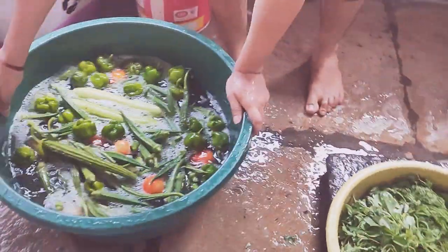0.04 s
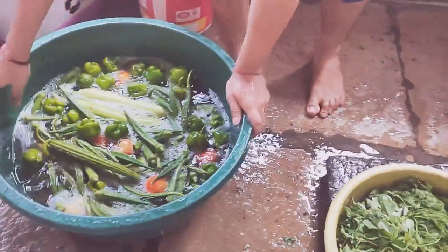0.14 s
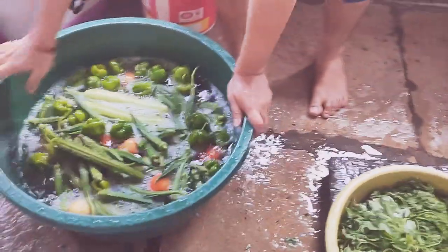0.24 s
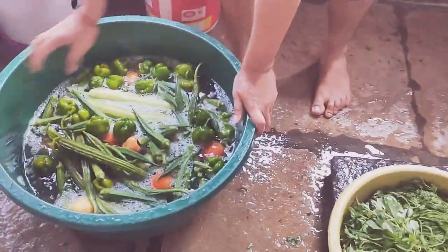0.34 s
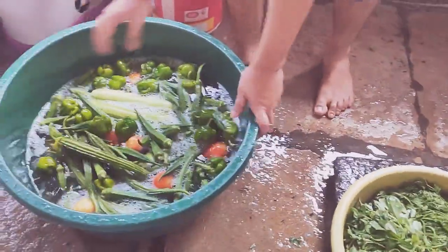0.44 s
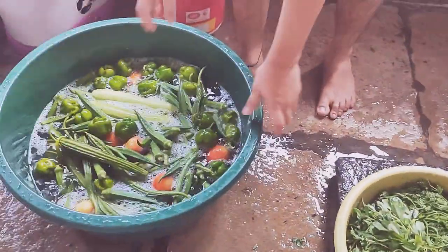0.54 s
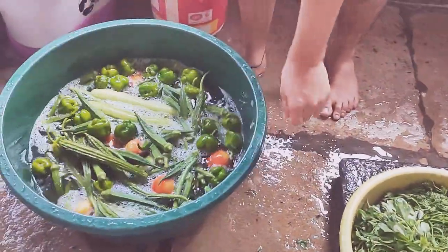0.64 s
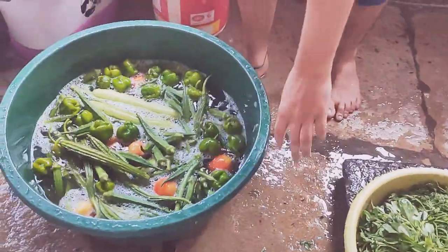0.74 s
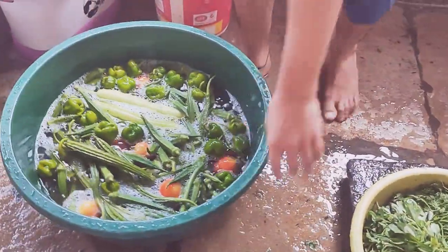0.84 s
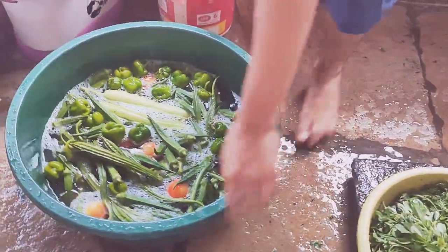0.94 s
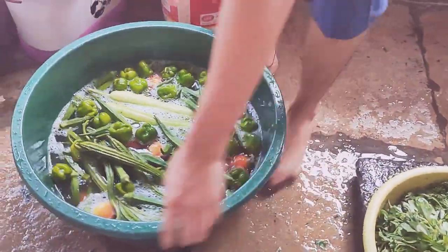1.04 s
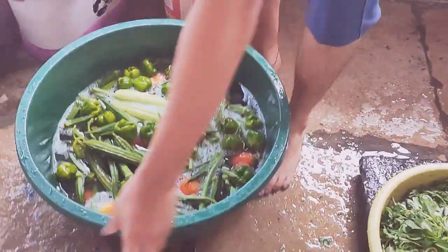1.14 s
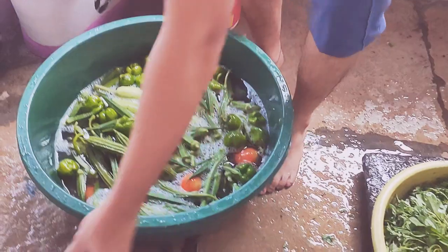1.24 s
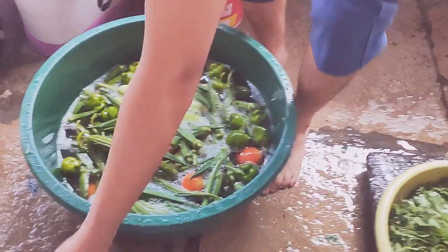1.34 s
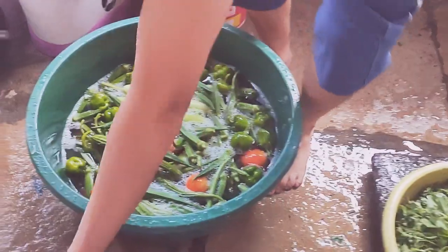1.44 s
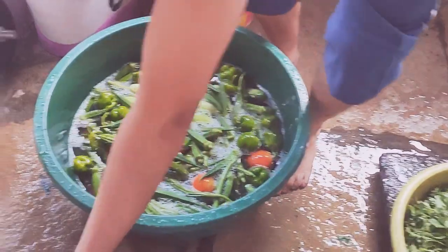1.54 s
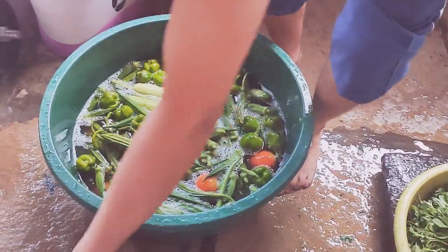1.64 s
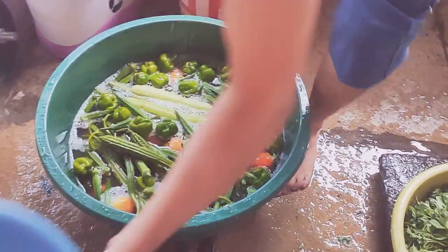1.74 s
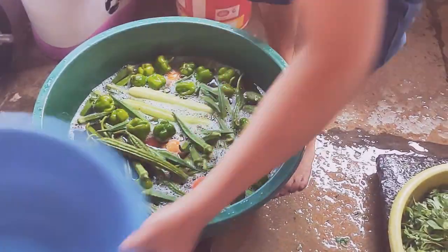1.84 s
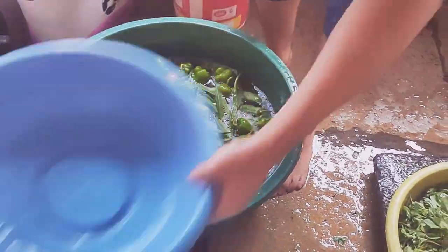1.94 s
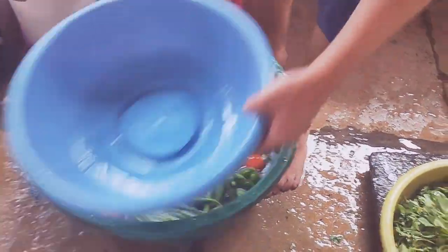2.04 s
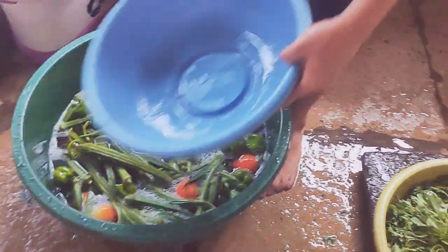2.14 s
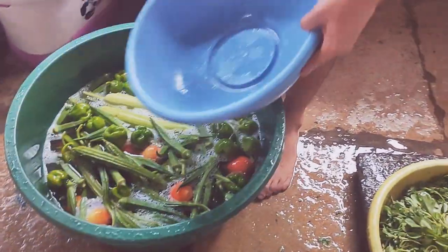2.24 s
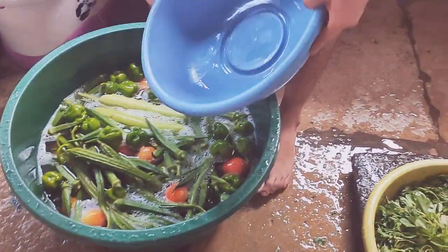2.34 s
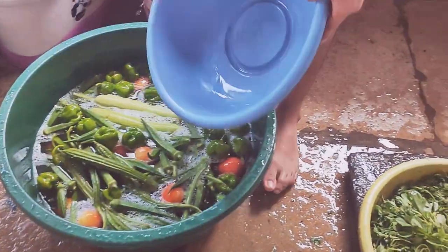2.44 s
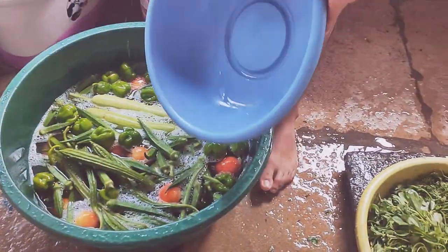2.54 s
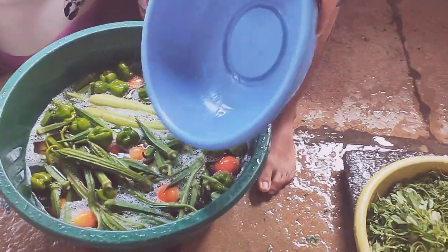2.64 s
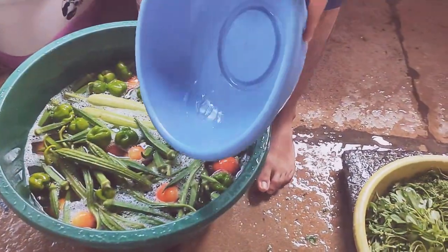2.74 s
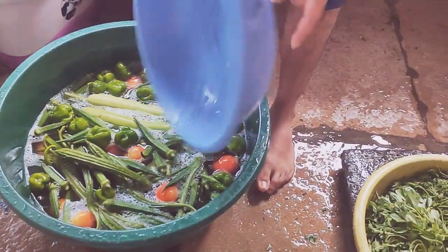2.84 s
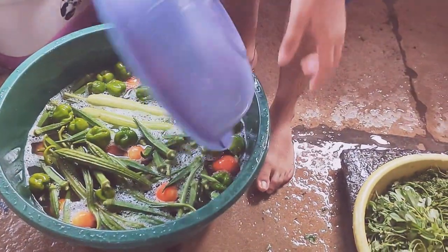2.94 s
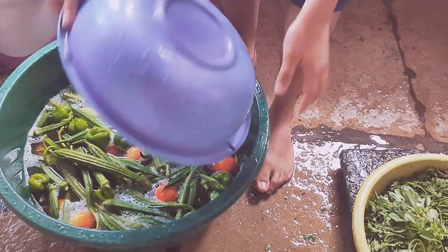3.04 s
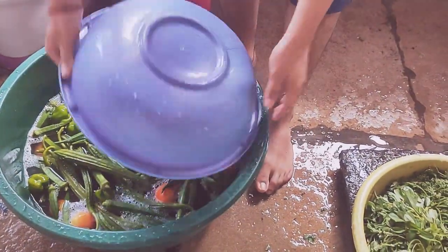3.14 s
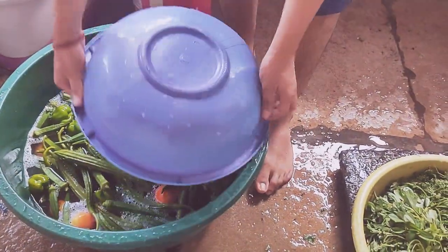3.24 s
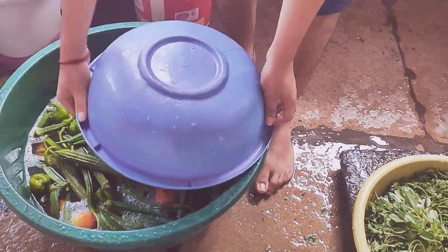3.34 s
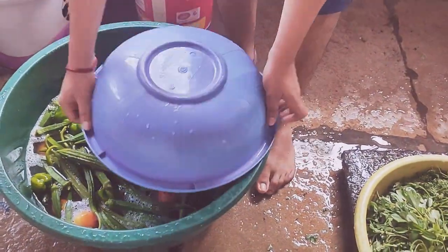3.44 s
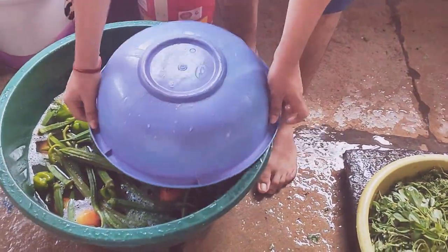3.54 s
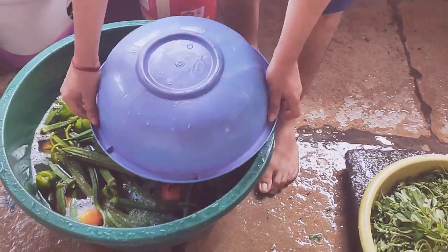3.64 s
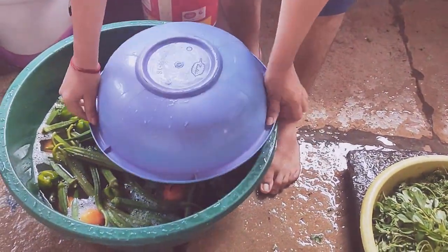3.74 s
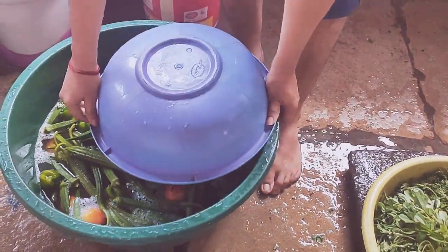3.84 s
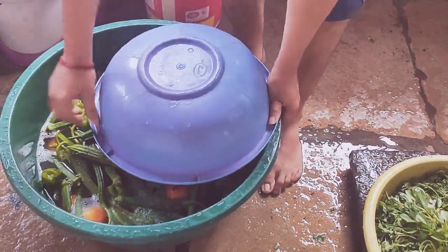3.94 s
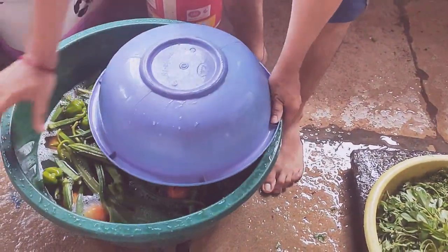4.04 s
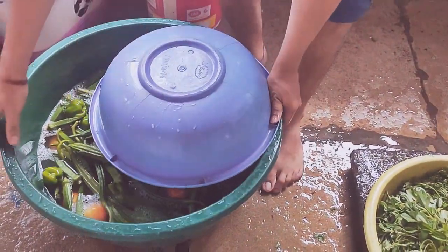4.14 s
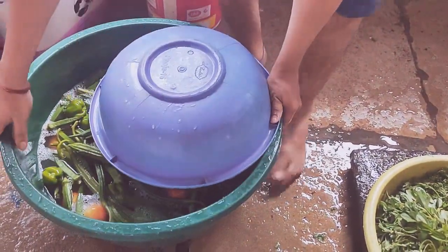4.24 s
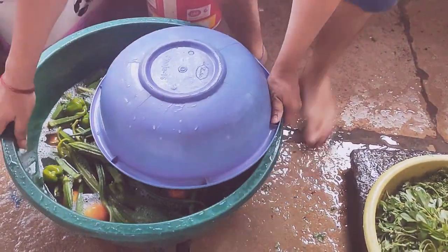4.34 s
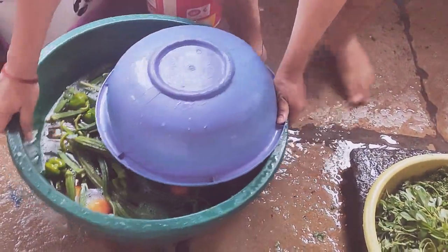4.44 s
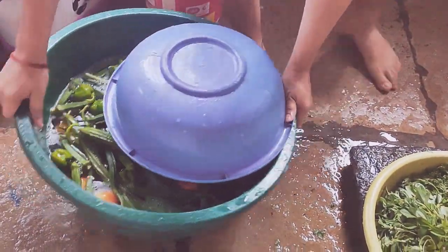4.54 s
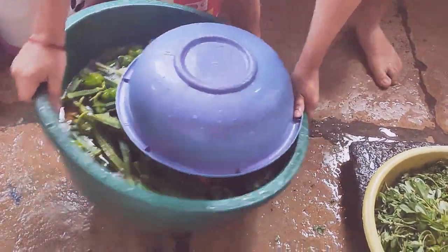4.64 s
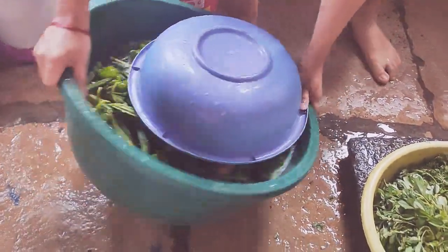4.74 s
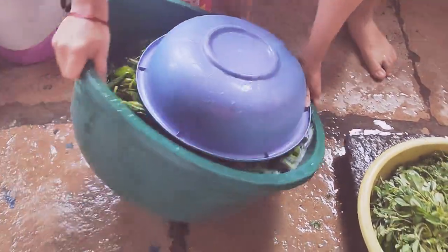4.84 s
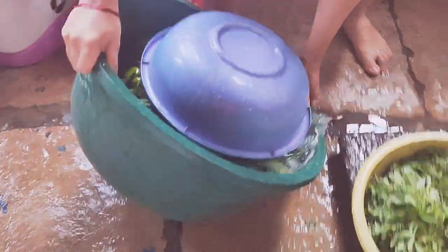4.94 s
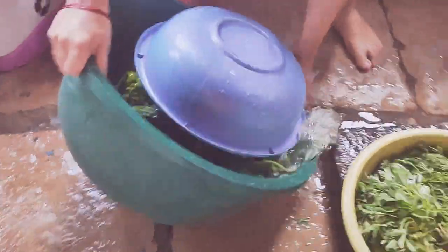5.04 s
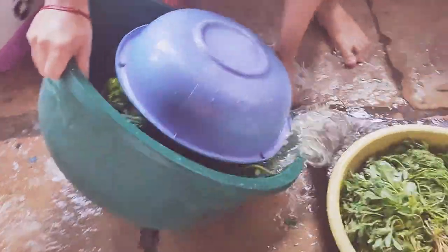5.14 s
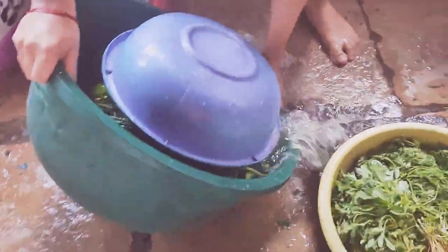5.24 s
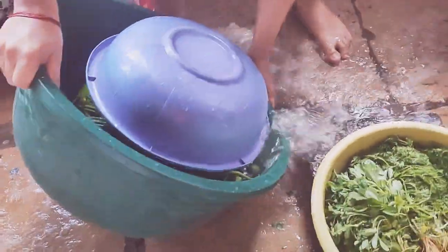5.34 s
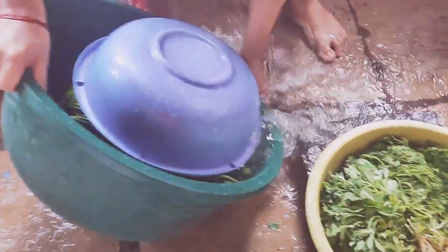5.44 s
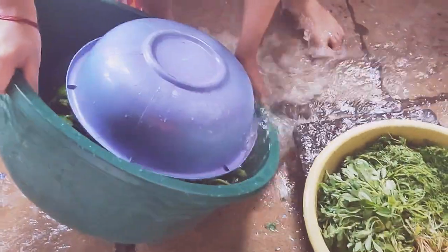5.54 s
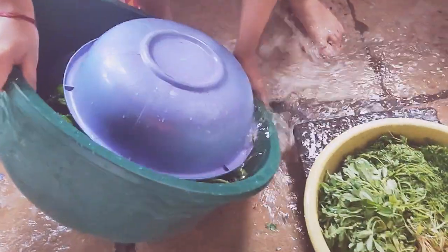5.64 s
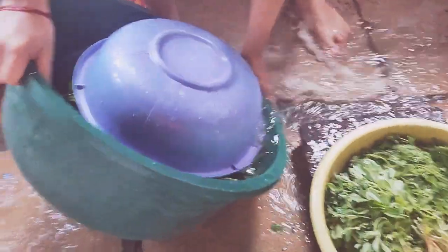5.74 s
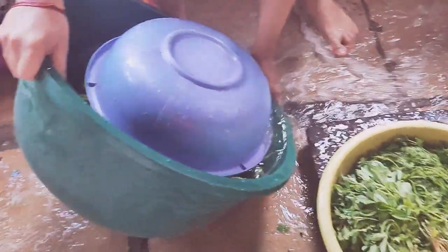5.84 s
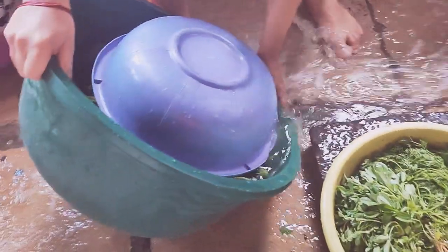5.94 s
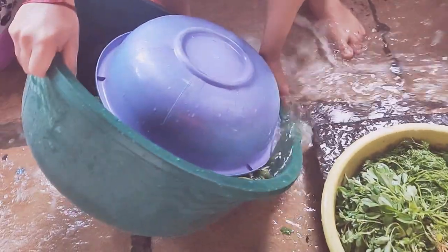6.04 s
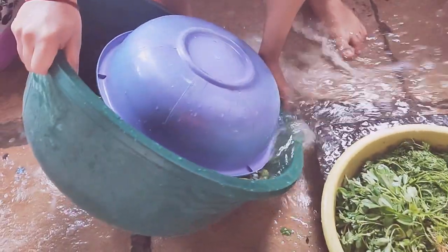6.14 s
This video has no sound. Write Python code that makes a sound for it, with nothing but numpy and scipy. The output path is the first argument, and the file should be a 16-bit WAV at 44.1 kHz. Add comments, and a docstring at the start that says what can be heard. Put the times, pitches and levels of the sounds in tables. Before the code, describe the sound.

Close wet trickle, drips and soft sloshing, a light hollow basin clack, one loud plastic thump, short scraping drags, then water spilling onto stone.

```python
"""In a small washroom, vegetables soak in a plastic tub on a wet stone floor, with water trickling and dripping.
A light basin knocks as it is picked up, and thumps when it is pressed over the vegetables as a lid.
The tub is dragged and tipped, and its water pours out over the stone.
Blows and jerks ring the plastic at its own pitches; water is built from random clicks and ringing bubbles."""
import sys
import numpy as np
from scipy import signal
from scipy.fft import rfft, irfft, next_fast_len
from scipy.io import wavfile

SR = 44100
rng = np.random.default_rng(int(sys.argv[2]) if len(sys.argv) > 2 else 0)


def store_wav(level_fs):
    """Save 16-bit WAV to argv[1]."""
    pcm = np.round(np.clip(np.atleast_2d(level_fs), -1, 1) * 32767)
    wavfile.write(sys.argv[1], SR, pcm.T.astype(np.int16))


N = 272538
TIME = np.arange(N) / SR  # seconds

# Drops smacking the wet stone. Each row: start in seconds, relative level in dB.
DRIPS = [(0.1335, -40.5), (0.187, -30.5), (0.3797, -36.5), (0.4718, -38), (0.788, -27.5), (0.9584, -37.5),
         (1.037, -36.5), (1.1176, -36), (1.2656, -38.5), (1.33, -37), (1.5006, -40.5), (1.5347, -35.5),
         (1.692, -33.5), (1.8587, -39), (2.006, -35), (2.111, -37), (2.198, -35), (2.2572, -36.5),
         (2.5347, -43.5), (2.569, -36), (2.735, -27.5), (2.9324, -37), (3.1075, -44), (3.824, -36),
         (3.914, -32), (3.9908, -33.5), (4.2375, -42), (4.2694, -32), (4.4587, -27), (4.6016, -41),
         (4.925, -36.5), (5.029, -35), (5.1041, -34.5), (5.905, -38.5), (6.0145, -30.5), (6.08, -27.5)]
# Pitches at which the full tub rings. Each row: pitch in Hz, relative level in dB, time to fall 60 dB in seconds.
TUB_MODES = [(107.4, -11.5, 0.15), (158.3, -1.5, 0.15), (193.7, -1.5, .08), (216, -2, 0.18),
             (237.7, -13.5, 0.45), (287.4, -4, 0.2), (333, -17, 0.22), (375.8, -10, 0.2),
             (421, -16.5, 0.28), (543, -19.5, 0.45), (629, -11.5, 0.11), (686, -22, 0.026),
             (706, -22, 0.15), (776, -12.5, 0.17), (970, -12.5, 0.11), (1095, -18, 0.23),
             (1055, -21.5, 0.17), (1310, -29.5, 0.28), (1600, -36, .18)]
# Flow of the stream from the tipped tub. Each row: time in seconds, relative level in dB.
POUR_FLOW = [(5.0, -66), (5.1, -49), (5.22, -45.5), (5.41, -40.5), (5.51, -40), (5.62, -37.5), (5.76, -41),
             (6.1, -44), (6.18, -41)]


def tub_knocks():
    """Blows on the full tub ring its heavy, water-loaded wall."""
    # Each row: start in seconds, relative strength in dB, contact time in milliseconds.
    blows = [(3.274, -38, 0.12), (3.518, -30.5, 0.12), (3.558, -28, 0.11), (3.7585, -5, 0.18),
             (3.7835, -16.5, 0.15), (3.7995, -11, 0.47), (3.8285, -18.5, 0.6), (4.001, -28, 0.13),
             (4.19, -27, 0.47), (4.698, -36, 0.54), (4.875, -27, 0.22)]
    return knocks(blows, TUB_MODES, crack_db=-11.0, crack_s=0.029, tick_db=-14, wet_db=-7.5)


def basin_knocks():
    """Knocks of the light, empty basin ring its thin shell."""
    # Each row: start in seconds, relative strength in dB, contact time in milliseconds.
    blows = [(.187, -37, 0.22), (.419, -36.5, 0.48), (1.6085, -27, 0.15), (1.6257, -44, 0.14),
             (1.6325, -11.5, 0.14), (1.6598, -39, 0.17), (1.6712, -23, 0.15), (1.7222, -34, 0.2),
             (2.35, -35.5, 0.21)]
    # Pitches of the shell. Each row: pitch in Hz, relative level in dB, time to fall 60 dB in seconds.
    basin_modes = [(137, -19, 0.6), (213.6, -3, 0.13), (268, -12.5, 0.09), (354, -14.5, 0.17),
                   (427, 2, 0.16), (460, -14, 0.043), (606, -8, 0.17), (653, -1.5, 0.051), (731, -17, 0.22),
                   (868, -16.5, 0.29), (1020, -31, 0.1), (1320, -19, 0.1), (1630, -35, .12),
                   (1957, -14, 0.053)]
    return knocks(blows, basin_modes, crack_db=-11.0, crack_s=0.022, tick_db=1, wet_db=-6.0)


def knocks(rows, modes, crack_db, crack_s, tick_db, wet_db):
    """Each blow ticks, rings the shell and rattles briefly; a longer contact is duller."""
    # Spectrum of rattling plastic. Each row: frequency in Hz, relative level in dB.
    crack_colour = [(50, -29.5), (120, -15), (300, -8), (600, 0.5), (950, -1.5), (1600, -10), (2700, -25),
                    (4500, -12), (6500, 3), (8000, -12.5)]
    # Spectrum of the first instant of a blow on plastic. Each row: frequency in Hz, relative level in dB.
    tick_colour = [(100, 5.5), (600, -4.5), (1400, 6.5), (2800, -17.5), (4500, -19.5), (6500, -3.5),
                   (8000, -10)]
    force, t = np.zeros(N), TIME[:SR // 8]
    for s, db, contact_ms in rows:
        push = np.exp(-t / (contact_ms / 1000 + 1e-6))
        add(force, s, amp(db) * push / push.sum())
    crack = unit(colour(rng.standard_normal(len(t)), crack_colour)[0]) * np.exp(-t / crack_s)
    tick = colour(1. * (t == 0), tick_colour)[0]
    body = ring(modes)
    add(body, 0, amp(crack_db) * crack + amp(tick_db) * tick / abs(tick).max())
    return room(signal.oaconvolve(force, body)[:N], wet_db)


def ring(modes):
    """What a plastic shell rings with after one sharp blow: fading tones, scaled to peak 1."""
    t = TIME[:SR // 2]
    wave = np.zeros(len(t))
    for k, (hz, db, t60) in enumerate(modes):
        wave += amp(db - 60 * t / t60) * np.sin(2 * np.pi * hz * t + k * k)
    wave = wave * (1 - np.exp(-t / 0.0021))  # the blow takes a moment to spread over the wall
    return wave / abs(wave).max()


def drag(gain_db=0, slips_per_s=320, rub_db=-3):
    """The heavy tub slips over the stone in small jerks that ring its wall, over a dull rubbing."""
    # Shoves of the tub. Each row: hardest push in seconds, relative level in dB,
    # build-up in seconds, run-out in seconds.
    shoves = [(3.57, -36, 0.06, 0.034), (3.88, -37, 0.05, 0.26), (4.18, -36.5, 0.12, 0.14),
              (4.709, -39, 0.032, .07), (4.915, -34.5, 0.044, 0.091)]
    jerk_colour = [(80, -5.5), (200, -0.5), (400, 0.0), (560, 1.0), (900, -14), (2000, -18.0)]  # Hz, dB
    dull = [(70, -32.5), (130, -12.5), (180, 1.0), (300, -5.5), (420, -12.5), (600, -18.5),
            (1200, -36.5), (4000, -50.5)]  # Hz, dB
    jerks = colour(impacts(slips_per_s, spread_db=-0.2), jerk_colour)[0]
    wall = unit(signal.oaconvolve(jerks, ring(TUB_MODES))[:N])
    rub = unit(colour(impacts(per_s=900, spread_db=-1.0), dull))
    push = together(swell(*row) for row in shoves)
    return amp(gain_db) * push * unit(room(wall + amp(rub_db) * rub, wet_db=-1))


def rubs(gain_db=0, slips_per_s=700, cycles=3.5, count=4):
    """Wet skin sticks and slips on the plastic wall; each slip rings a well-damped patch of it."""
    # Slides of wet hands. Each row: start in seconds, length in seconds, relative level in dB, middle pitch in Hz.
    slides = [(0.816, 0.079, -57.5, 1460), (1.262, 0.083, -59.5, 2010), (1.464, 0.086, -56, 1630),
              (3.272, 0.056, -51.5, 1320), (3.335, .12, -52.5, 1784), (3.469, .12, -53, 1325),
              (4.498, 0.1, -61.5, 920)]
    out = np.zeros(N)
    for s, length, db, hz in slides:
        size = int(length * SR)
        slips = rng.standard_normal((count, size)) * (rng.random((count, size)) < slips_per_s / SR)
        patches = hz * np.geomspace(.86, 1.14, count)
        squeak = np.zeros(size)
        for row, patch_hz in zip(slips, patches):
            squeak += signal.fftconvolve(row, bubble(patch_hz, cycles, glide=0))[:size]
        add(out, s, amp(db) * unit(squeak) * signal.windows.tukey(size, .6))
    return amp(gain_db) * room(out, wet_db=-4.5)


def pour(spray_db=1, gurgle_db=-6.5, hollow_db=-51):
    """The stream breaks into spray on the stone, churns bubbles and drums softly in the tub."""
    # Spectrum of the spray. Each row: frequency in Hz, relative level in dB.
    spray_colour = [(1180, -48.5), (2000, -11), (2870, -14), (4910, -9), (6250, 3.5), (6670, 6.5),
                    (7590, -2.5), (7960, -18.5), (8200, -32), (10700, -56.5), (18000, -120)]
    gurgle_colour = [(500, -4.0), (720, -6), (1100, 2.5), (1700, 0), (3000, -1)]  # Hz, dB
    lag_s = 0.036  # bubbles surface a little after the water lands
    churn_power = 1.08  # bubbling grows faster than the flow, by this power
    spurts = surge(rate=12, depth_db=-0.4)
    spray = unit(room(colour(impacts(per_s=2500, spread_db=3.0) * spurts, spray_colour), wet_db=1.0))
    froth = bubbles(494.5, 3560, per_s=1000, cycles=4.5, spread_db=3.0, count=28) * spurts
    gurgle = unit(room(colour(froth, gurgle_colour), wet_db=3.0))
    hollow = unit(room(bubbles(163.9, 203, per_s=160, cycles=13.0, spread_db=5.0, count=4), wet_db=5.0))
    flow = level(POUR_FLOW)
    share = flow / flow.max()
    churn = np.interp(TIME - lag_s, TIME, flow.max() * share ** churn_power)
    drumming = np.sqrt(share)  # the tub answers even a thin stream
    return amp(spray_db) * flow * spray + amp(gurgle_db) * churn * gurgle + amp(hollow_db) * drumming * hollow


def trickle(spatter_db=-1, bubbling_db=-2):
    """Running water spatters on the floor in spurts, more after each drop, with small bubbles in the puddle."""
    # Spectrum of the spatter. Each row: frequency in Hz, relative level in dB.
    spatter_colour = [(530, -28), (900, -2), (969, -16), (1430, -10.5), (1580, -34), (1720, -6),
                      (1920, -19.5), (2420, -13), (2810, -15), (3950, -14), (4750, -14.5), (6630, 0),
                      (7550, -7.5), (8200, -35), (10700, -72.5), (18000, -120)]
    # Spectrum of small bubbles in the puddle. Each row: frequency in Hz, relative level in dB.
    fizz_colour = [(1000, -3.5), (1750, -9), (2000, -3.5), (2400, 1.5), (3000, -1), (3900, 5.5),
                   (4800, -10), (6000, -14.5)]
    # Water running over the stone. Each row: time in seconds, relative spatter level in dB,
    # relative bubbling level in dB.
    runoff = [(0, -47.5, -56), (.3, -48.5, -55), (.46, -53, -64), (.65, -51.5, -61), (.9, -46.5, -61.5),
              (1.42, -49.5, -59.5), (1.85, -48, -58), (2.4, -47.5, -59), (3.2, -48.5, -59.5),
              (3.4, -49, -59), (3.7, -48.5, -58), (4.2, -48.5, -57), (4.56, -50.5, -63), (4.8, -47, -60),
              (5.2, -48.5, -53.5)]
    # Bursts of fine bubbles. Each row: crest in seconds, relative level in dB.
    froth_bursts = [(.04, -53), (0.322, -49), (0.714, -54), (.975, -69), (1.12, -50.5), (1.7, -48),
                    (1.82, -52), (2.2, -53), (2.561, -53), (4.02, -49.5), (4.612, -50)]
    scatter_db, rise_s, fall_s = -16, .006, 0.026  # droplets thrown by each drop, relative to its smack
    spatter = colour(impacts(per_s=600, spread_db=4.0) * surge(rate=23, depth_db=2.5), spatter_colour)
    swarm = bubbles(1017.5, 5130, per_s=700, cycles=8.1, spread_db=1)
    froth = colour(swarm * surge(rate=11, depth_db=2.5), fizz_colour)
    scatter = together(swell(s + 2 * rise_s, db + scatter_db, rise_s, fall_s) for s, db in DRIPS)
    bursts = together(swell(s, db, rise_s=0.01, fall_s=0.022) for s, db in froth_bursts)
    spatter_gain = together([amp(spatter_db) * level(runoff), scatter])
    froth_gain = together([amp(bubbling_db) * level(runoff, column=2), bursts])
    return spatter_gain * unit(room(spatter, wet_db=5.5)) + froth_gain * unit(room(froth, wet_db=7.0))


def drips(gain_db=4.5, splash_s=0.0039, splash_db=-13, small_db=-56):
    """A drop smacks the stone and throws brief droplets; small drops fall at random throughout."""
    # Spectrum of a drop's smack. Each row: frequency in Hz, relative level in dB.
    smack_colour = [(1000, -34), (3000, -33.5), (4800, -26), (5700, 0), (6550, 7), (7400, -1), (8200, -17)]
    hits, t = np.zeros(N), TIME[:SR // 20]
    for s, db in DRIPS:
        splash = amp(splash_db) * rng.standard_normal(len(t)) * np.exp(-t / splash_s) + (t == 0)
        smack = colour(splash, smack_colour)[0]
        add(hits, s, amp(db) * smack / abs(smack).max())
    small = unit(colour(impacts(per_s=61, spread_db=3.5), smack_colour))
    return amp(gain_db) * room(hits, wet_db=2.5) + amp(small_db) * unit(room(small, wet_db=2.5))


def plops(gain_db=-2, cycles=6, scatter=0.093, gap_s=0.0055, count=5):
    """Each splash traps one large bubble and then a few weaker ones near it in pitch."""
    # Small splashes. Each row: start in seconds, relative level in dB, first bubble's starting pitch in Hz.
    splashes = [(.15, -42.5, 926), (.187, -43, 820), (.32, -52, 2530), (.675, -42, 870),
                (1.424, -33.5, 1584), (1.704, -36.5, 1585), (2.172, -42, 2290), (2.256, -36, 2310),
                (2.676, -42.5, 1400), (2.952, -40.5, 2440), (3.646, -36.5, 1020), (3.66, -34, 538),
                (3.885, -33.5, 533), (4.343, -38.5, 1090), (5.321, -36, 1300), (5.396, -30.5, 1954),
                (5.645, -36, 1043)]
    out, order = np.zeros(N), np.arange(count)
    for s, db, hz in splashes:
        delays = gap_s * (order + rng.uniform(-0.35, 0.484, count) * (order > 0))
        pitches = hz * np.exp(scatter * rng.standard_normal(count) * (order > 0))
        for k in order:
            add(out, s + delays[k], amp(db - 3.0 * k) * bubble(pitches[k], cycles, glide=0.035))
    return amp(gain_db) * room(out, wet_db=0.5)


def slosh(gain_db=-1):
    """Water laps between the vegetables and the tub wall, trapping small pockets of air."""
    # Spectrum of lapping. Each row: frequency in Hz, relative level in dB.
    lap_colour = [(70, -30.5), (150, 3.5), (300, 1), (450, 0.5), (700, -6.5), (950, -17.5), (1400, -11.5),
                  (2500, -39.5)]
    # Waves slapping the tub wall, now and then. Each row: crest in seconds, relative level in dB.
    wave_crests = [(.25, -45.5), (.44, -52), (.7, -50), (.87, -51), (1.04, -49.5), (1.179, -52),
                   (1.52, -44), (1.74, -44), (2.21, -49), (2.359, -45.5), (2.681, -60), (3.05, -50),
                   (3.3, -48.5), (3.66, -39.5), (3.89, -40), (4.35, -46), (4.559, -47), (4.688, -41.5),
                   (5.04, -48)]
    steady_db = -53.5  # the lapping that goes on between waves, before gain_db
    lip_db = -7.5  # lapping at the lip, relative to the flow curve, before gain_db
    laps = unit(colour(impacts(per_s=450, spread_db=4.0), lap_colour))
    pockets = unit(bubbles(262.3, 950, per_s=160, cycles=4, spread_db=2.0))
    waves = together(swell(s, db, rise_s=0.038, fall_s=0.089) for s, db in wave_crests)
    motion = together([amp(steady_db), waves, amp(lip_db) * level(POUR_FLOW)])
    return amp(gain_db) * motion * unit(room(laps + amp(-5.5) * pockets, wet_db=-3.0))


def thuds(gain_db=0, ring_s=0.032):
    """Weight shifting on the floor: a soft load gives a few slow cycles and no click."""
    # Each row: start in seconds, relative level in dB, pitch in Hz.
    shifts = [(0.031, -42.5, 31.8), (2.851, -42.5, 65.4), (3.11, -42, 52.5), (3.237, -40, 54.4),
              (3.275, -38.5, 75), (3.515, -39.5, 92), (3.85, -34, 62), (4.871, -33.5, 101)]
    out, t = np.zeros(N), TIME[:SR // 5]
    for s, db, hz in shifts:
        envelope = np.exp(-t / ring_s) * (1 - np.exp(-t / .004))
        add(out, s, amp(db) * np.sin(2 * np.pi * hz * t) * envelope)
    return amp(gain_db) * room(out, wet_db=-20.0)


def background(rumble_db=-52.5):
    """Steady low rumble of the surroundings, made from filtered noise."""
    # Spectrum of the rumble. Each row: frequency in Hz, relative level in dB.
    rumble_colour = [(10, -15), (28, 1.5), (44, -1), (80, -4), (150, -7), (400, -28.5), (1500, -26),
                     (8000, -46.5)]
    return amp(rumble_db) * unit(diffuse(colour(rng.standard_normal((2, N)), rumble_colour)))


def impacts(per_s, spread_db):
    """Random clicks of either sign; a wider spread makes their sizes more unequal."""
    size = amp(spread_db * np.minimum(rng.exponential(1, N), 4)) * rng.choice([-1, 1], N)
    return size * (rng.random(N) < per_s / SR)


def bubble(hz, cycles, glide):
    """A trapped air pocket rings and, with a glide, rises in pitch as it nears the surface."""
    age = TIME[:SR // 8] * hz / cycles  # 1 when the ringing has faded to about a third
    phase = 2 * np.pi * cycles * (age + glide * np.minimum(age, 5) * age / 2)
    return np.sin(phase) * np.exp(-age) * (1 - np.exp(-age * cycles))


def bubbles(low_hz, high_hz, per_s, cycles, spread_db, count=20):
    """A swarm of bubbles of many sizes, each size with its own pitch."""
    births, kind = impacts(per_s, spread_db), rng.integers(0, count, N)
    pitches = np.geomspace(low_hz, high_hz, count) * rng.uniform(.97, 1.03, count)
    out = np.zeros(N)
    for k, hz in enumerate(pitches):
        out += signal.oaconvolve(births * (kind == k), bubble(hz, cycles, 0.055))[:N]
    return out


def surge(rate, depth_db, count=24):
    """Water arrives in uneven spurts: a random gain that wanders up to rate times a second."""
    t, speeds = np.arange(0, N / SR + .01, .002), np.geomspace(rate / 5, rate, count)
    wander = unit(np.sin(2 * np.pi * (speeds * t[:, None] + rng.random(count))).sum(1))
    return unit(amp(depth_db * np.interp(TIME, t, wander)))


def swell(s, db, rise_s, fall_s):
    """A gain that builds smoothly to its crest at time s and then dies away."""
    age = TIME - s
    drop = np.where(age < 0, (age / rise_s) ** 2, age / fall_s)
    return amp(db) * np.exp(-np.minimum(drop, 20))


def together(gains):
    """Unrelated sounds add in power."""
    return np.sqrt(sum(gain ** 2 for gain in gains))


def level(rows, column=1, fade=0.13):
    """A dB curve as a gain over time, fading out beyond its ends."""
    s, db = np.transpose(rows)[[0, column]]
    outside = np.maximum(np.maximum(s[0] - TIME, TIME - s[-1]), 0)
    return amp(np.interp(TIME, s, db)) * np.exp(-outside / fade)


def amp(db):
    """Decibels to gain."""
    return 10 ** (np.asarray(db) / 20)


def unit(x):
    """Scales to an average (rms) level of 1."""
    return x / np.sqrt(np.mean(x ** 2) + 1e-20)


def read(points, hz):
    """Reads a table between its points on a log-frequency axis."""
    f, value = np.transpose(points)
    return np.interp(np.log(hz + 1), np.log(f + 1), value)


def add(mix, s, sound):
    """Mixes a sound in at time s."""
    part = mix[..., max(round(s * SR), 0):][..., :sound.shape[-1]]
    part += sound[..., :part.shape[-1]]


def colour(x, points):
    """Filters with the given spectrum, never sounding ahead of its input (minimum phase)."""
    log_gain = np.log(amp(read(points, abs(np.fft.fftfreq(4096, 1 / SR)))))
    taps = np.fft.ifft(np.exp(np.conj(signal.hilbert(log_gain)))).real[:2048]
    taps = taps / np.linalg.norm(taps)
    return signal.oaconvolve(np.atleast_2d(x), taps[None], axes=1)[:, :x.shape[-1]]


def diffuse(pair):
    """Makes two unrelated signals as alike at each frequency as two ports hear a diffuse sound."""
    # Each row: frequency in Hz, likeness from -1 (opposite) to 1 (the same).
    likeness = [(30, 1), (130, 0.9), (280, 0.6), (500, .5), (1000, -0.23), (1500, -0.54), (3000, 0),
                (8000, -0.52)]
    size = next_fast_len(pair.shape[1])
    a, b = rfft(pair, size)
    angle = np.arccos(np.clip(read(likeness, np.fft.rfftfreq(size, 1 / SR)), -1, 1)) / 2
    shared, opposed = a * np.cos(angle), b * np.sin(angle)
    return irfft([shared + opposed, shared - opposed], size)[:, :pair.shape[1]]


def room(x, wet_db, count=3):
    """Direct sound plus dense reflections off tile and stone, in patterns that trade places steadily."""
    # Decay of the washroom. Each row: frequency in Hz, time to fall 60 dB in seconds.
    decay = [(100, 0.15), (300, 0.56), (1000, 0.25), (3000, 0.25), (7000, 0.33)]
    x, size = np.atleast_2d(x), SR * 2 // 3
    out = x * np.ones((2, 1))
    for k in range(count):
        taps = rng.standard_normal((2, size)) * (rng.random((2, size)) < 5000 / SR)
        taps = taps * (TIME[:size] > .002)
        hz, t, z = signal.stft(diffuse(taps), SR, nperseg=256)
        tail = signal.istft(z * amp(-60 * t / read(decay, hz)[:, None]), SR, nperseg=256)[1]
        tail = unit(tail) / np.sqrt(tail.shape[1])
        share = np.sqrt(2 / count) * np.cos(np.pi * (2 * TIME + k / count))
        out = out + amp(wet_db) * signal.fftconvolve(x * share, tail, axes=1)[:, :N]
    return out


def from_right(pair, lag_ms=0.31):
    """Sound from the tub's side reaches the left port a little later."""
    return np.array([np.interp(TIME - lag_ms / 1000, TIME, pair[0]), pair[1]])


def scene():
    """Plastic, water and room together."""
    plastic = from_right(basin_knocks() + tub_knocks() + drag() + thuds())
    water = drips() + trickle() + plops() + slosh() + pour()
    return plastic + rubs() + water + background()


def record(dry):
    """Two microphone ports, each with its own colour; then the treble is cut off."""
    # Balance of the ports. Each row: frequency in Hz, left minus right in dB.
    balance = [(60, 4.5), (200, 4), (350, 2.5), (550, -0.5), (900, -2), (1550, -13.5), (2000, -13),
               (2800, 0.5), (4000, 2), (4700, 3), (5700, 9), (6500, 19.5), (7400, 0), (8000, 8.5)]
    edge_hz = 7880
    size = next_fast_len(N + SR // 10)
    lean_db = read(balance, np.fft.rfftfreq(size, 1 / SR))
    gains = amp([lean_db / 2, -lean_db / 2])
    gains = gains / np.sqrt(np.mean(gains ** 2, axis=0))  # same average power at every frequency
    heard = irfft(rfft(dry, size) * gains, size)[:, :N]
    low_pass = signal.firwin(301, edge_hz, window=("kaiser", 7), fs=SR)
    return signal.oaconvolve(heard, low_pass[None], "same", axes=1)


dry = scene()
out = record(dry)
store_wav(out)
```